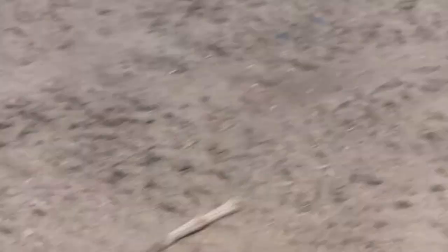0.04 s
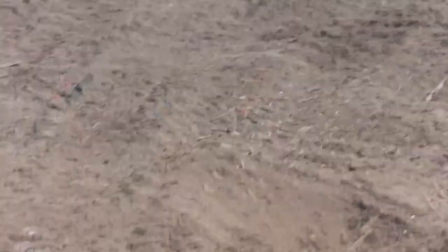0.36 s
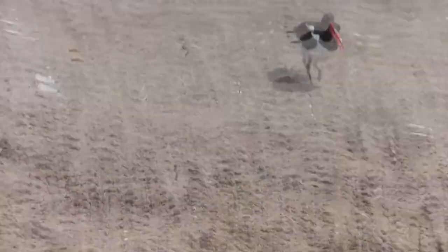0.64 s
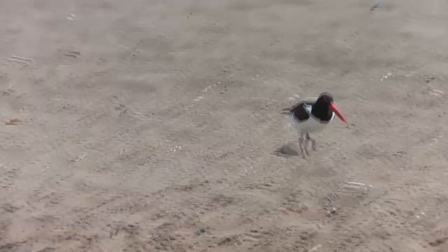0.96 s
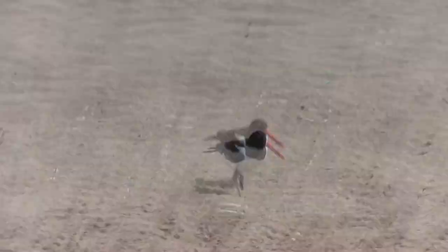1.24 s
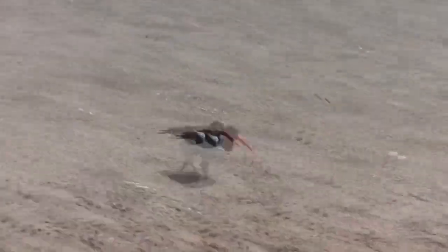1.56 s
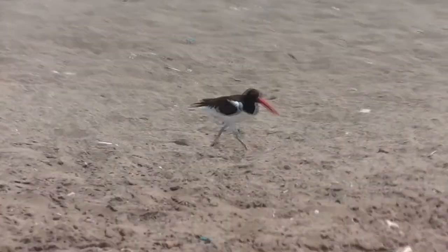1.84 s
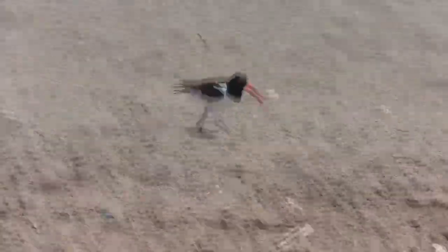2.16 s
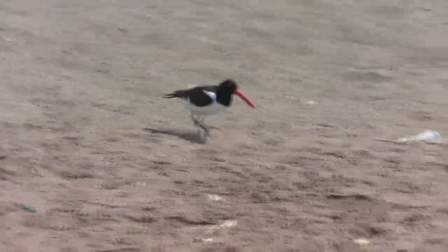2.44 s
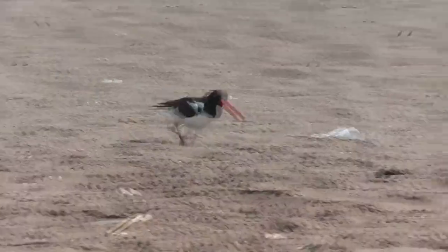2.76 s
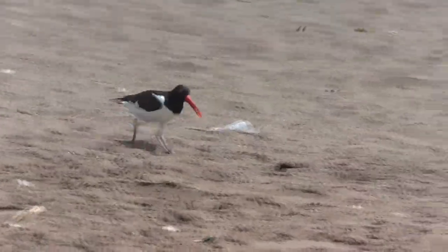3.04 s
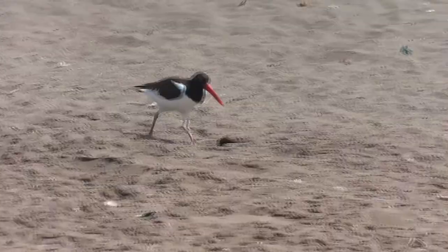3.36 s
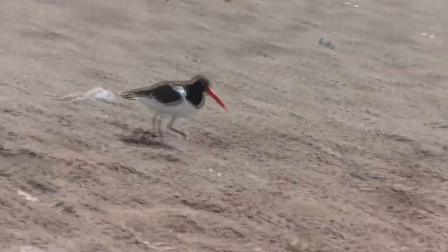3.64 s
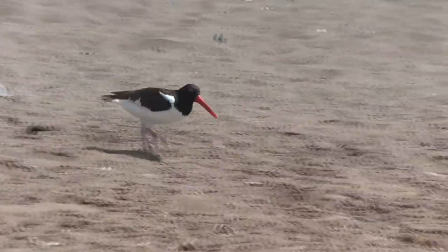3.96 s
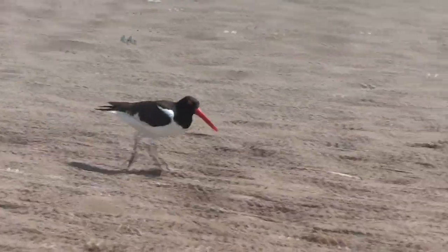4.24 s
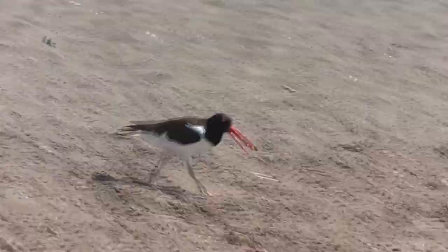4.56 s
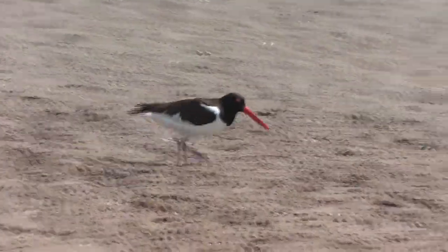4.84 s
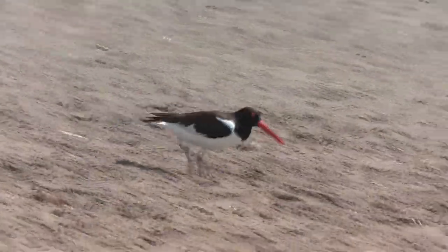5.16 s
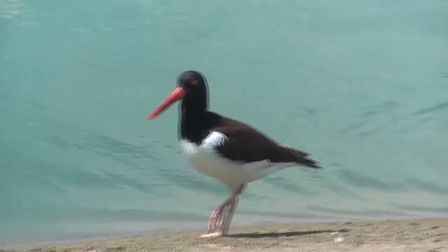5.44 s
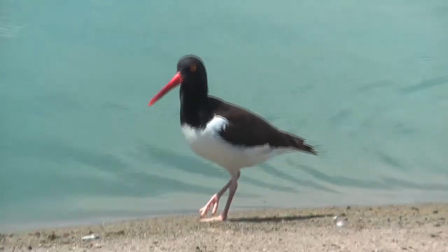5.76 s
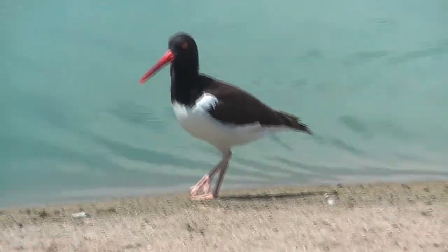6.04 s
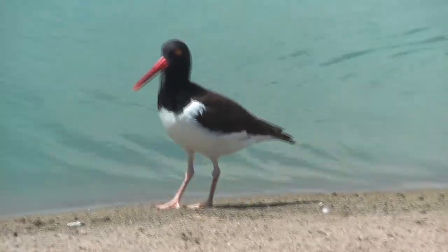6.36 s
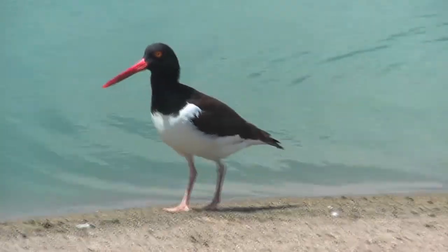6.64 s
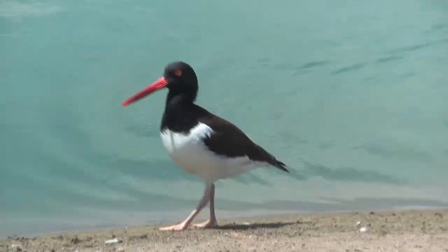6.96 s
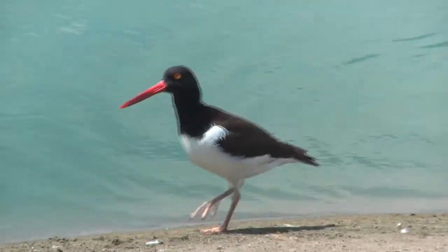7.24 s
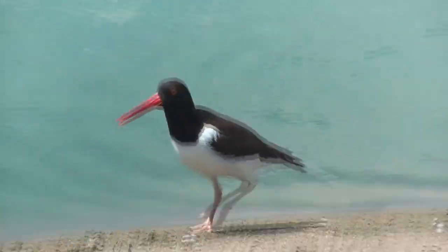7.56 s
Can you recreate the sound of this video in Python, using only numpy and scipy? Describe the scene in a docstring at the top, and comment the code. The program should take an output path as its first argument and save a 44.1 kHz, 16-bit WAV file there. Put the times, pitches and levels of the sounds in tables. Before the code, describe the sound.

Gusty wind buffets the microphone on a shore while a wading bird pipes four sharp kips and another answers faintly.

```python
"""Oystercatcher on a windy shore.

Four sharp 'kip' calls sound from the right: syrinx harmonics shaped by throat and bill. Each rises from a low
rasp; three break upward into a clear whistle. Another bird answers far off. Wind rumbles and buffets on the
microphone over ticks, wavelets and hiss. Late on, the background drops out for an instant and resumes quieter."""
import sys
import numpy as np
from scipy import signal
from scipy.fft import rfft, irfft
from scipy.io import wavfile
from scipy.ndimage import uniform_filter1d

SR = 44100
rng = np.random.default_rng(int(sys.argv[2]) if len(sys.argv) > 2 else 0)


def wav_record(signal):
    """Record a signal, one row per channel, as 16-bit PCM in the file named by sys.argv[1]."""
    frames = np.transpose(np.atleast_2d(signal))
    bounded = np.clip(frames, -1, 1)
    # unit amplitude maps onto the largest positive 16-bit level
    quanta = np.round(bounded * 32767).astype(np.int16)
    wavfile.write(sys.argv[1], SR, quanta)


N = 335160
TIME = np.arange(N) / SR
SWITCH_S, CUTOFF_HZ = 5.254, 15900

# Near calls. Each row: start and rise in seconds, low note in Hz, its level and overtones in dB,
# rasp in seconds, onset burst in dB, break delay in seconds, whistle in Hz (0: no break), its level
# and the break burst in dB, fall delay and release in seconds, left gain and top-octave gain in dB.
NEAR_CALLS = [(0.7395, .0102, 2045, -15.8, -2, .0085, -27.5, .0265, 2675, -13.6, -33, .045, .017, -16.5, -4.5),
              (1.8125, .0105, 2070, -12.5, -4, .011, -29, .0275, 2675, -15.5, -28, .040, .0155, -17.5, 3.5),
              (3.0508, .012, 2035, -10, -1, .021, -27.5, .034, 2508, -12.8, -22, .049, .0155, -20.5, -.5),
              (4.635, .0145, 1986, -9.6, 1.8, .027, -26, 0, 0, 0, 0, .0545, .0075, -20.5, -8)]
# Throat and bill resonances. Each row: frequency in Hz, gain in dB.
THROAT_DB = [(700, -28), (1100, -23), (1450, -6), (2700, 1.0), (3900, -6.3), (4600, -10), (5350, -7),
             (5900, -15.5), (6500, -20.5), (7900, -8), (9200, -16), (10300, -4.5), (12600, -7),
             (13600, -16), (15800, -18)]
# Call colour at the left microphone. Each row: frequency in Hz, extra gain in dB.
CALL_LEFT_DB = [(2000, -3), (2700, -1), (3950, 0), (4500, -5), (5200, 9), (8000, 14.5), (10000, 13.5),
                (14000, -37)]
# Call phase at the left microphone. Each row: frequency in Hz, lead in radians.
CALL_LEAD_RAD = [(2000, -1.5), (4000, -0.46), (5300, 0.67), (8000, 1.55), (10500, -.4)]
# Far bird. Each row: start and length in seconds, start and end pitch in Hz, level in dB,
# relative second harmonic in dB.
FAR_NOTES = [(0.415, .048, 1640, 1890, -55, 5), (0.46, .013, 2560, 2420, -48, -12),
             (1.475, 0.025, 1720, 1900, -58, 8), (1.499, 0.038, 2540, 2500, -49, -14),
             (3.375, 0.06, 1595, 1830, -51, -0.5), (5.462, 0.026, 1520, 1630, -47.5, -13),
             (6.13, 0.032, 1555, 1730, -48.5, -11)]
# Wind strength. Each row: time in seconds, base rumble level in dB.
WIND_DB = [(0, -28), (0.8, -27.5), (1.05, -23.5), (1.4, -25), (1.9, -25.5), (2.2, -17.8), (2.4, -17.8),
           (2.6, -26.5), (3.2, -27.5), (3.8, -26), (4.35, -28), (5.25, -27), (5.265, -34), (5.88, -34),
           (6.08, -28.8), (6.7, -29), (6.87, -33), (7.15, -29)]
# Eddy size. Each row: time in seconds, deep bass gain in dB.
DEEP_BASS_DB = [(0, 0), (1.5, 5), (2.3, 3), (3.8, -15), (5.2, -7), (5.6, 9), (7.6, 4.5)]
# Gusts. Each row: centre and half-width in seconds, low lift, upper lift and leftward tilt in dB.
WIND_GUSTS = [(.43, .03, 6, 1, 1), (2.05, .08, 2, -1, 5), (2.265, .028, 2, 6, 7),
              (2.366, .024, 3.5, 12, 10), (2.413, .02, 2, 10.5, 4), (2.805, .018, 3.5, 6.5, 5),
              (4.54, .08, 3, 7, 0.5), (5.16, .045, 5, 5.5, 0.5), (6.135, .012, 3, 9, 1),
              (6.48, .04, 2, 3.5, 0), (6.72, .016, 2, 4.5, 0.5)]
# Rumble spectrum. Each row: frequency in Hz, relative level in dB.
RUMBLE_DB = [(13, -38), (22, -21.5), (81, -2), (161, 0), (268, -6.5), (360, -17.5), (395, -18.5),
             (447, -23.5), (556, -29), (900, -41), (1170, -50), (2000, -61), (4000, -95)]
# Rumble balance. Each row: frequency in Hz, left minus right in dB.
RUMBLE_PAN_DB = [(30, 2.5), (120, -0.5), (250, -2), (400, -6), (700, -8.5)]
# Rumble likeness. Each row: frequency in Hz, left-right correlation.
RUMBLE_CORRELATION = [(30, .58), (150, 0.64), (400, 0.68), (800, .3)]
# Rumble and hiss phase. Each row: frequency in Hz, left lead in radians.
NOISE_LEAD_RAD = [(40, 1), (120, -0.8), (260, -0.98), (780, -1.47), (3000, -2.5), (5300, -1.5),
                  (7000, -0.5), (15000, -15)]
# Single eddies. Each row: centre and half-width in seconds, relative peak in dB, pitch in Hz.
EDDY_THUMPS = [(.322, 0.012, -17, 130.1), (.435, 0.011, -10, 97.2), (1.083, 0.009, -10.5, 130),
               (1.811, 0.0066, -5.5, 115), (2.253, 0.0081, -6, 190.6), (2.284, 0.0051, -11, 226.2),
               (2.372, .014, -9, 189.9), (2.413, 0.004, -4, 228), (2.471, 0.0037, -11, 226),
               (2.799, 0.0024, -15, 246.2), (2.811, 0.019, -12.5, 178.3), (5.939, 0.0048, -10.5, 151.8),
               (6.013, 0.0042, -10.5, 100), (6.131, 0.0048, -9.5, 235), (6.453, .006, -17, 220),
               (6.511, 0.003, -9, 143.5), (6.72, 0.0037, -14.5, 235.3), (7.088, .008, -17, 85)]
# Ticks and taps. Each row: start in seconds, peak in dB, centre and bandwidth in Hz,
# crumble decay in seconds, relative snap in dB.
DRY_TICKS = [(1.2764, -15, 1180, 1350, 0.00022, -40), (5.518, -42, 8000, 7000, .002, -14),
             (5.919, -37.5, 5900, 6100, 0.0025, -8), (5.995, -39, 7000, 7000, .002, -6),
             (6.070, -36, 5470, 4000, .002, -10), (6.081, -41.5, 6500, 7000, .002, -8),
             (6.150, -37.5, 5200, 5000, .002, -8), (6.159, -32, 4700, 4000, 0.0019, -10),
             (6.336, -27.5, 1050, 2200, .008, -20), (6.43, -40, 8000, 6100, 0.0024, -10),
             (6.963, -35, 9400, 7000, .003, -10), (7.018, -32, 1260, 1590, 0.0057, -23),
             (7.0885, -21, 2780, 1150, .0015, -15)]
# Wavelets. Each row: centre and half-width in seconds, level in dB, spray offset in dB.
WAVELET_LAPS = [(0.686, 0.038, -46.5, 3), (1.09, 0.034, -54, 0), (5.644, 0.012, -45, -4),
                (6.31, 0.052, -55, 5), (6.343, 0.011, -51, 5), (6.912, 0.021, -47.5, -4),
                (6.963, 0.0085, -47.5, 9), (7.565, 0.023, -51.5, 2)]
# Hiss course. Each row: time in seconds, relative level in dB, treble gain in dB.
HISS_COURSE_DB = [(0, -47.5, 7), (.9, -47.5, 7), (1.5, -46, 7), (2.2, -46.5, 4.5), (2.8, -45, 3),
                  (3.6, -46.5, 2.5), (4.4, -47, 2), (5.25, -48, 4.5), (5.262, -52.5, 0), (5.9, -51.5, 1),
                  (6.3, -47, -4), (6.7, -50.5, 0.5), (7.15, -50.5, 0), (7.6, -53, 4.5)]
# Hiss spectrum before 5.25 s. Each row: frequency in Hz, relative level in dB.
EARLY_HISS_DB = [(410, -19.5), (700, 2), (860, -3.5), (1200, -6), (1550, -6.5), (2000, -6.5), (2860, -11),
                 (4000, -14.5), (5400, -14), (6500, -23.5), (7800, -19), (10500, -29), (14200, -40.5),
                 (15800, -47)]
# Hiss spectrum after 5.25 s. Each row: frequency in Hz, relative level in dB.
LATE_HISS_DB = [(470, -25), (850, -1.5), (1300, -2.5), (2000, -6), (3400, -9), (5300, -13), (6400, -21),
                (8200, -16), (10000, -20.5), (13000, -28), (15800, -36)]
# Hiss balance. Each row: frequency in Hz, left minus right in dB.
HISS_PAN_DB = [(60, -10), (110, 11), (200, 0), (380, 1.5), (700, -8), (1290, -12), (2380, -16), (4400, -15),
               (8120, -4), (15000, -33.5)]
# Hiss likeness. Each row: frequency in Hz, left-right correlation.
HISS_CORRELATION = [(800, 0.22), (2000, 0.49), (5000, 0.3), (12000, 0.7)]


def kip(start_s, rise_s, low_hz, low_db, low_overtones_db, rasp_s, onset_db, break_s,
        whistle_hz, whistle_db, break_db, fall_s, release_s, left_db, top_db):
    """One near call: voice, breath and bursts of chaotic membrane flapping; rasp shakes the pitch."""
    span = (TIME >= start_s) & (TIME < start_s + fall_s + 1.5 * release_s)
    t = TIME[span] - start_s
    pitch_hz, level_db, overtones_db, rasp, whistling = syrinx(
        t, rise_s, low_hz, low_db, low_overtones_db, rasp_s,
        break_s, whistle_hz, whistle_db, fall_s, release_s)
    phase = phase_rad(pitch_hz * (1 + (.0014 + .021 * rasp) * wobble(470, len(t))))
    # Top overtones die first.
    faded_db = (np.maximum.accumulate(level_db) - level_db - 7).clip(0)
    slope_db = np.where(whistling, -7.5, -5.5) - .25 * faded_db
    voice = throat(pitch_hz, phase, rasp, overtones_db, slope_db, left_db, top_db)
    throat_noise = unit_rms(butter(rng.standard_normal(len(t)), [1700, 5200], "band", order=4))
    fizz = unit_rms(butter(rng.standard_normal(len(t)), [7500, 13000], "band", order=3))
    breath = from_db(-37) * throat_noise + from_db(top_db - 38) * (1 + 2 * rasp) * fizz
    onset_burst = from_db(onset_db) * np.exp(-(t / .0056 - .8) ** 2)
    break_burst = whistling.any() * from_db(break_db) * np.exp(-((t - break_s) / .0028) ** 4)
    call = np.sqrt(2) * from_db(level_db) * (voice + from_right(breath, left_db / 2))
    call += from_right((onset_burst + break_burst) * throat_noise, left_db)
    out = np.zeros((2, N))
    out[:, span] = call * signal.windows.tukey(len(t), .03)
    return out


def syrinx(t, rise_s, low_hz, low_db, low_overtones_db, rasp_s,
           break_s, whistle_hz, whistle_db, fall_s, release_s,
           start_hz=1360, attack_db=19.5, release_db=23, rasp_fade_s=.016, rasp_loss_db=2.5):
    """The voice's course: a rasping climb to a low note, an optional whistle, a dying fall."""
    pitch_hz = low_hz + (start_hz - low_hz) * np.exp(-(t / rise_s) ** 1.5)
    level_db = low_db - attack_db * (1 - ease(t / (1.55 * rise_s)))
    rasp = .03 + .85 * (1 - ease((t - rasp_s) / rasp_fade_s + .5))
    ending = np.maximum(t - fall_s, 0) / release_s
    whistling = (t >= break_s) & (whistle_hz > 0)
    if whistle_hz > 0:
        scoop = 1 - .12 * np.exp(-np.abs(t - break_s) / .0012)
        pitch_hz = np.where(whistling, whistle_hz * scoop, pitch_hz)
        level_db = np.where(whistling, whistle_db, level_db)
        # The low note turns pure just before the break; the whistle brightens as it falls.
        purity_db = 16 * np.exp(-((t - break_s + .0055) / .006) ** 2)
        bright_db = 1 + 5.5 * np.sin(np.pi * np.minimum(ending, 1))
        overtones_db = np.where(whistling, bright_db, low_overtones_db - purity_db)
    else:
        dulling_db = 12 * ease((t - fall_s) / .011 + .5)
        overtones_db = low_overtones_db - dulling_db
    pitch_hz *= 1 - .135 * ease(ending / .82)
    level_db -= rasp_loss_db * rasp + release_db * ending ** 2
    return pitch_hz, level_db, overtones_db, rasp, whistling


def throat(pitch_hz, phase, rasp, overtones_db, slope_db, left_db, top_db, flutter_db=2):
    """Partials through throat and bill; rasp doubles the period, adding half-order partials."""
    voice = np.zeros((2, len(phase)))
    for k in np.arange(1, 17) / 2:
        if k == 1:
            strength = 1
        elif k % 1:
            strength = rasp * from_db(-1 - 7 * np.log2(max(k - .5, 1)))
        else:
            strength = from_db(overtones_db + slope_db * (k - 2.5))
        hz = k * pitch_hz
        # The highest partials are beamed and flutter most.
        beam_db = np.minimum((hz / 10000) ** 2, 1.5) * (top_db + flutter_db * wobble(260, len(hz)))
        gain = strength * from_db(at_hz(THROAT_DB, hz) + beam_db) * (hz < CUTOFF_HZ)
        left_gain = gain * from_db(left_db + at_hz(CALL_LEFT_DB, hz))
        voice += [left_gain * np.sin(k * phase + at_hz(CALL_LEAD_RAD, hz)), gain * np.sin(k * phase)]
    return voice


def sand_scatter(x, wet_db=-27.5, t60_s=.03):
    """Rough sand throws back a faint, short tail."""
    t = TIME[:SR // 4]
    tail = butter(rng.standard_normal((2, len(t))), 6300, "low", order=4) * from_db(-60 * t / t60_s)
    tail /= np.sqrt(np.sum(tail ** 2, axis=1, keepdims=True))
    return x + from_db(wet_db) * signal.fftconvolve(x[1:], tail, axes=1)[:, :N]


def far_bird(flicker_db=2):
    """Distant gliding notes: only two harmonics carry, each flickering in the wind."""
    out = np.zeros(N)
    for start_s, length_s, start_hz, end_hz, level_db, second_db in FAR_NOTES:
        start, size = int(start_s * SR), int(length_s * SR)
        u = np.linspace(0, 1, size)
        pitch_hz = end_hz + (start_hz - end_hz) * (1 - u) ** 2
        phase = phase_rad(pitch_hz * (1 + .01 * wobble(400, size)))
        note = sum(from_db(db + flicker_db * wobble(150, size)) * np.sin(k * phase)
                   for k, db in [(1, 0), (2, second_db)])
        out[start:start + size] += from_db(level_db) * np.sqrt(8 * u * (1 - u)) * note
    return from_right(out, left_db=-16)


def wind(split_hz=340, mean_wind_db=-27, lumps_db=1.1):
    """Eddies on the microphone: lumpy rumble that brightens and leans left in gusts."""
    wind_db, = at_times(WIND_DB)
    low_lift_db, upper_lift_db, tilt_db = sum(
        np.outer(gains_db, np.exp(-((TIME - centre_s) / width_s) ** 2))
        for centre_s, width_s, *gains_db in WIND_GUSTS)
    noise = stereo_noise(RUMBLE_DB, RUMBLE_CORRELATION, RUMBLE_PAN_DB)
    low = butter(noise, split_hz, "low", order=5)
    upper = butter(noise, split_hz, "high", order=5)
    low += (from_db(at_times(DEEP_BASS_DB)[0]) - 1) * butter(low, 65, "low", order=1)
    # Level the noise so that the flow sets the slow swell.
    low /= np.sqrt(uniform_filter1d(np.mean(low ** 2, axis=0), SR // 12))
    lean = np.array([[1], [-.5]])
    low_db = wind_db + low_lift_db + .7 + .4 * tilt_db * lean
    upper_db = -40.3 + .45 * (wind_db - mean_wind_db) + upper_lift_db + wobble(14, N)
    upper_db = upper_db + (.5 + tilt_db) * lean
    rumble = from_db(low_db) * unit_rms(low) + from_db(upper_db) * unit_rms(upper)
    return rumble * from_db(lumps_db * wobble(36, N))


def buffets(gain_db=-2, left_lag_rad=1, centred_db=-11.5, waver=.23, skew=.12, flutter=.04):
    """Single eddies thump both microphones for a few uneven cycles; stronger ones lean left."""
    out = np.zeros((2, N))
    for centre_s, width_s, peak_db, hz in EDDY_THUMPS:
        span = np.abs(TIME - centre_s) < .1
        swell = np.exp(-((TIME[span] - centre_s) / width_s) ** 2)
        phase = phase_rad(hz * (1 + waver * wobble(254, len(swell)))) - np.array([[left_lag_rad], [0]])
        lean_db = (peak_db - centred_db) * np.array([[.2], [-.2]])
        roughness = skew * np.sin(2 * phase) + flutter * wobble(565, len(swell))
        thump = swell * (np.sin(phase) + swell * roughness)
        out[:, span] += from_db(peak_db + gain_db + lean_db) * thump
    return out


def ticks(crumble=.15):
    """Tiny dry contacts: a click and crumble through one broad resonance, plus a faint snap."""
    out, t = np.zeros(N), TIME[:SR // 25]
    for start_s, peak_db, hz, width_hz, crumble_s, snap_db in DRY_TICKS:
        push = (t == 0) + crumble * rng.standard_normal(len(t)) * np.exp(-t / crumble_s)
        low_hz = np.hypot(hz, width_hz / 2) - width_hz / 2
        tick = butter(push, [low_hz, low_hz + width_hz], "band", order=4)
        tick += from_db(snap_db) * butter(push, [hz / 3, hz * 2], "band", order=6)
        start = int(start_s * SR)
        out[start:start + len(t)] += from_db(peak_db) * tick / np.abs(tick).max()
    return from_right(out, left_db=-17)


def wavelets(spray_db=-10, grain_db=3):
    """Small waves fold on the sand: a grainy wash with fine spray."""
    wash = butter(rng.standard_normal(N), [600, 3900], "band", order=4)
    wash = unit_rms(wash * from_db(grain_db * wobble(200, N)))
    spray = butter(rng.standard_normal(N), [7000, 12500], "band")
    spray = unit_rms(spray * from_db(grain_db * wobble(530, N)))
    out = np.zeros(N)
    for centre_s, width_s, level_db, offset_db in WAVELET_LAPS:
        swell = from_db(level_db) * np.exp(-.5 * ((TIME - centre_s) / width_s) ** 2)
        out += swell * (wash + from_db(spray_db + offset_db) * spray)
    return from_right(out, left_db=-19)


def hiss(early_db=-3.5, late_db=-4.5, treble_hz=6500, flutter_db=.84):
    """The even wash of air and open water; its colour changes at 5.25 s."""
    level_db, treble_db = at_times(HISS_COURSE_DB)
    early_hiss = from_db(early_db) * stereo_noise(EARLY_HISS_DB, HISS_CORRELATION, HISS_PAN_DB)
    late_hiss = from_db(late_db) * stereo_noise(LATE_HISS_DB, HISS_CORRELATION, HISS_PAN_DB)
    noise = np.where(TIME < SWITCH_S, early_hiss, late_hiss)
    treble = noise - butter(noise, treble_hz, "low", order=1)
    return from_db(level_db + flutter_db * wobble(20, N)) * (noise + (from_db(treble_db) - 1) * treble)


def stereo_noise(spectrum_db, correlation, pan_db):
    """Unit-rms coloured noise at two microphones; correlation, pan and phase vary by frequency."""
    hz = np.arange(N // 2 + 1) * SR / N
    mid, side = rfft(rng.standard_normal((2, N)))
    alike, sign = np.clip(at_hz(correlation, hz), -1, 1), np.array([[1], [-1]])
    pair = np.sqrt(1 + alike) * mid + sign * np.sqrt(1 - alike) * side
    pair *= np.exp(.5j * sign * at_hz(NOISE_LEAD_RAD, hz))
    pair *= from_db(at_hz(spectrum_db, hz) + sign * at_hz(pan_db, hz) / 2)
    return unit_rms(irfft(pair, N))


def from_right(x, left_db):
    """A sound from the right is weaker at the left microphone."""
    return x * np.array([[from_db(left_db)], [1]])


def from_db(db):
    """Decibels to gain."""
    return 10 ** (np.asarray(db) / 20)


def unit_rms(x):
    """Scale to rms 1."""
    return x / np.sqrt(np.mean(x ** 2) + 1e-20)


def phase_rad(hz):
    """Running phase of a frequency curve."""
    return 2 * np.pi * np.cumsum(hz) / SR


def at_times(rows):
    """Interpolate each value column at every sample."""
    times_s, *columns = np.transpose(rows)
    return [np.interp(TIME, times_s, column) for column in columns]


def at_hz(rows, hz):
    """Interpolate on a log-frequency axis."""
    knots_hz, values = np.transpose(rows)
    return np.interp(np.log(np.maximum(hz, 1)), np.log(knots_hz), values)


def butter(x, hz, kind, order=2):
    """Causal Butterworth filter."""
    sos = signal.butter(order, np.clip(hz, 10, .45 * SR), kind, fs=SR, output="sos")
    return signal.sosfilt(sos, x + 1e-18)


def wobble(rate_hz, size):
    """Smooth random drift, rms 1."""
    return unit_rms(butter(rng.standard_normal(size + 8000), rate_hz, "low")[8000:])


def ease(u):
    """Smooth step from 0 to 1."""
    return .5 - .5 * np.cos(np.pi * np.clip(u, 0, 1))


def scene():
    """Birds over wind and water; wind and hiss drop out for an instant near 5.25 s."""
    near_bird = sand_scatter(sum(kip(*row) for row in NEAR_CALLS))
    dip = 1 - .9 * np.exp(-((TIME - SWITCH_S - .003) / .004) ** 4)
    return near_bird + far_bird() + ticks() + wavelets() + dip * (wind() + buffets() + hiss())


def record(dry):
    """Steep low-pass."""
    return signal.sosfilt(signal.ellip(12, .1, 80, CUTOFF_HZ, fs=SR, output="sos"), dry)


dry = scene()
out = record(dry)
wav_record(out)
```